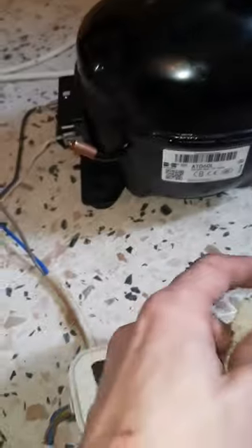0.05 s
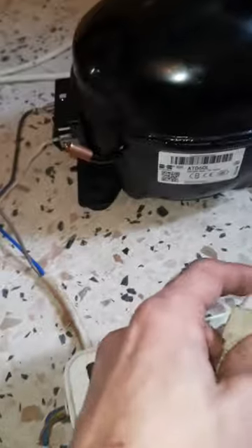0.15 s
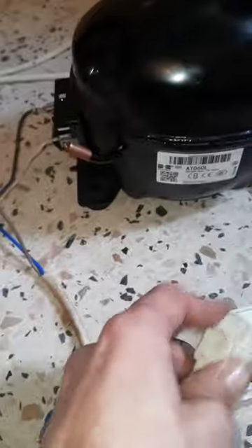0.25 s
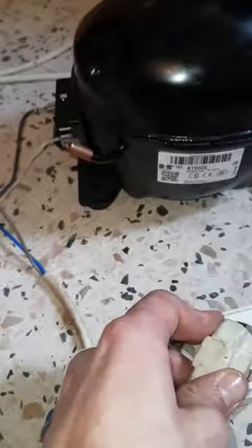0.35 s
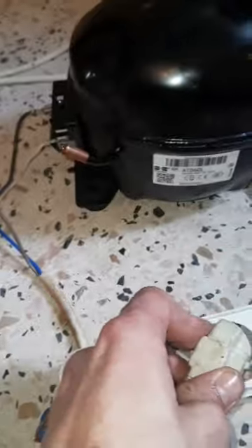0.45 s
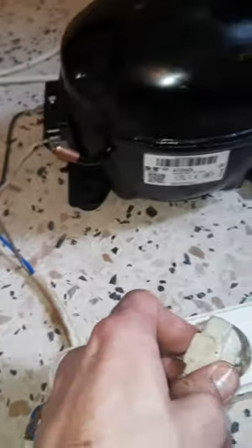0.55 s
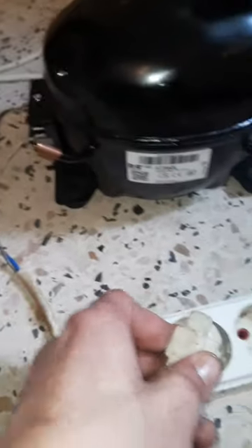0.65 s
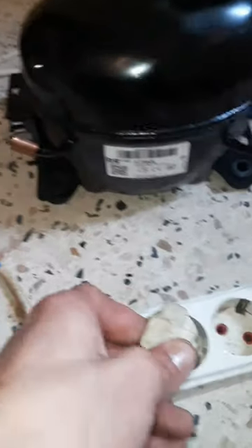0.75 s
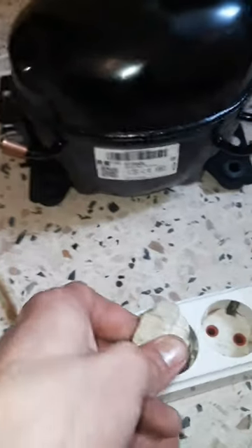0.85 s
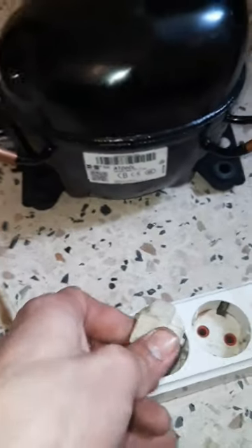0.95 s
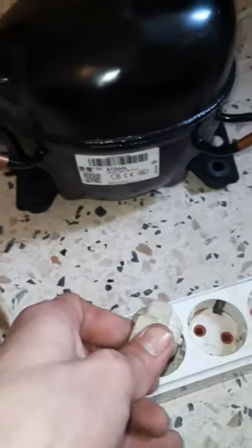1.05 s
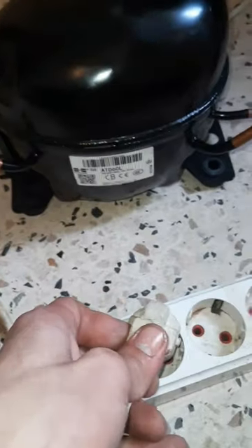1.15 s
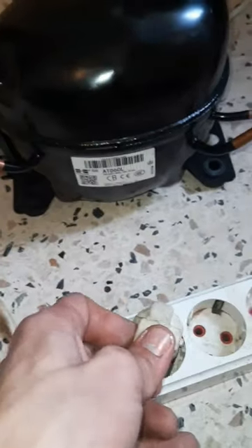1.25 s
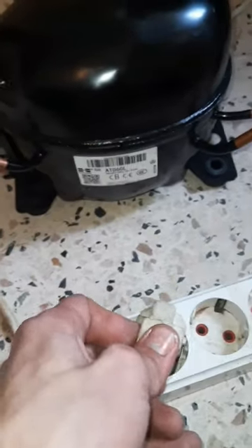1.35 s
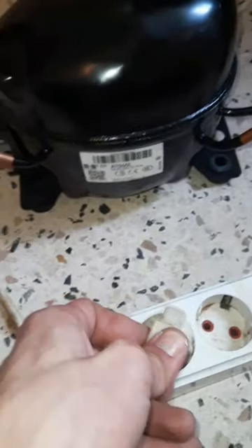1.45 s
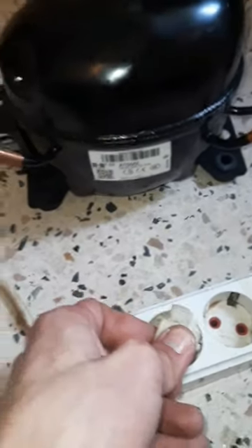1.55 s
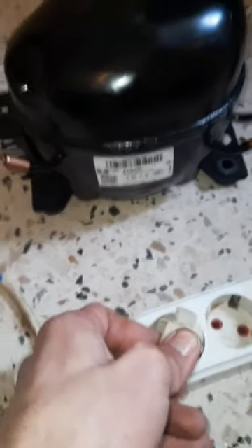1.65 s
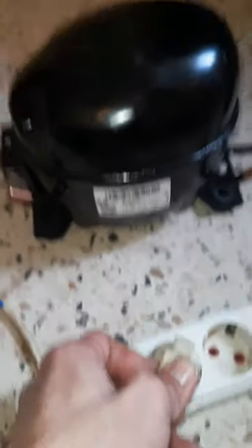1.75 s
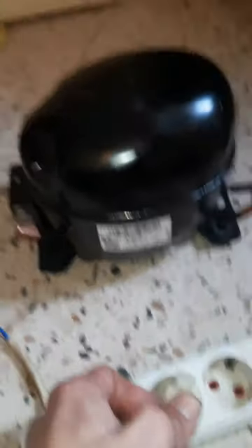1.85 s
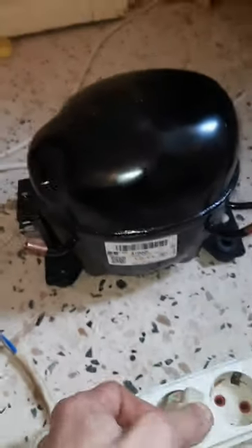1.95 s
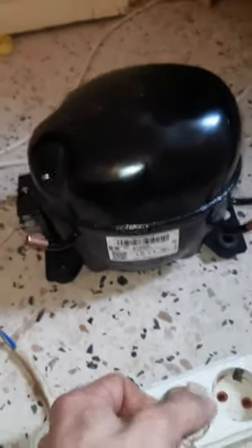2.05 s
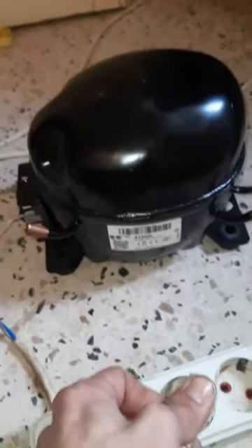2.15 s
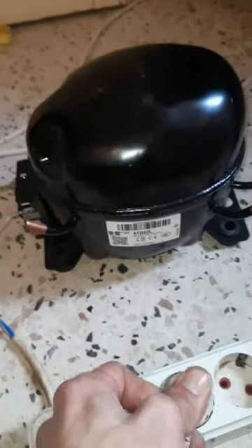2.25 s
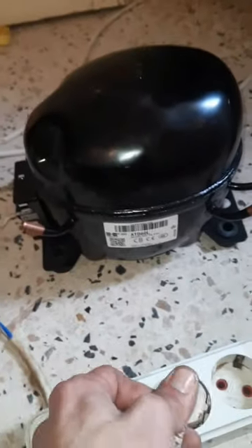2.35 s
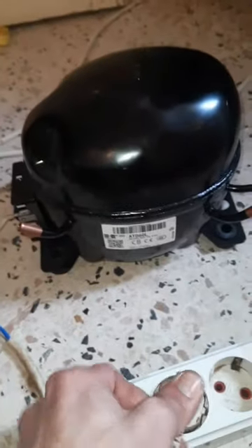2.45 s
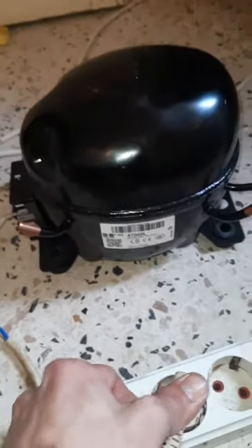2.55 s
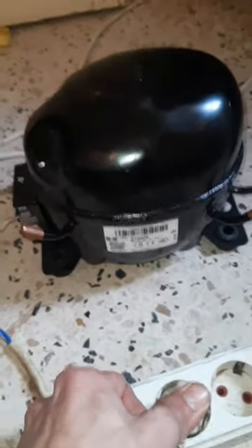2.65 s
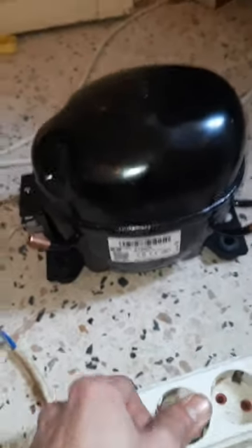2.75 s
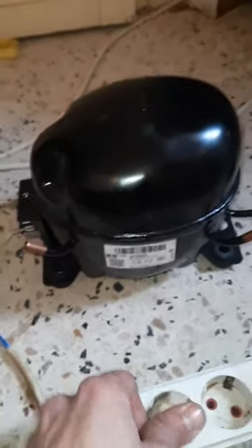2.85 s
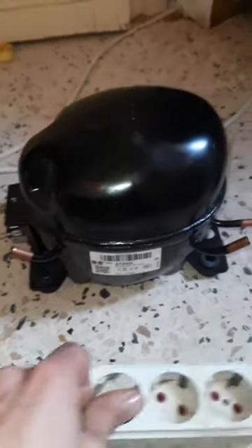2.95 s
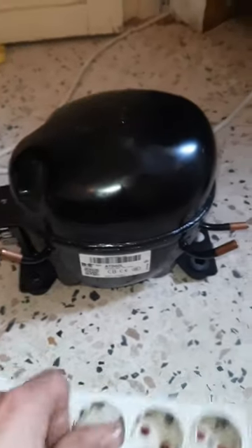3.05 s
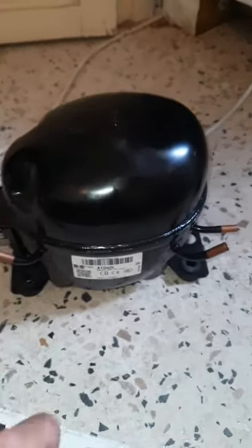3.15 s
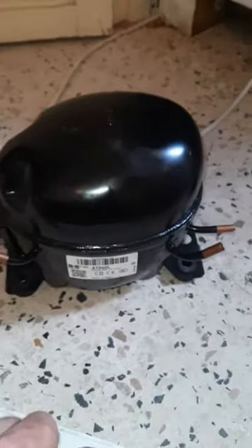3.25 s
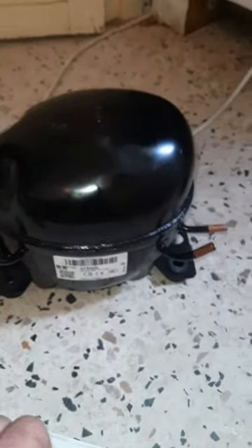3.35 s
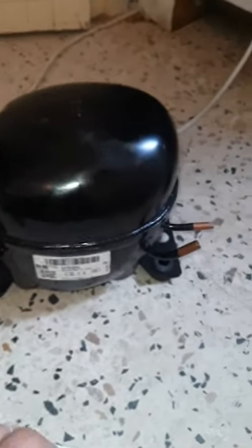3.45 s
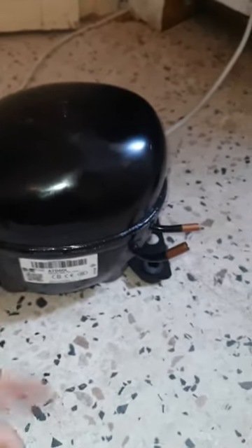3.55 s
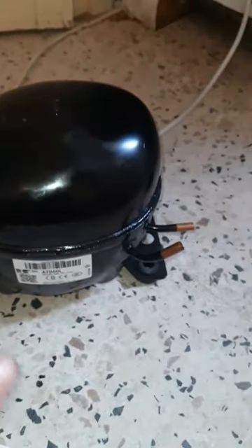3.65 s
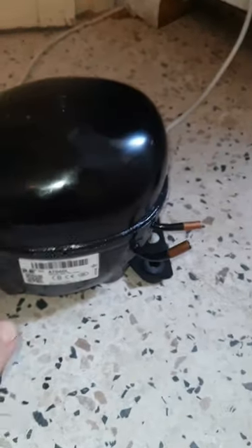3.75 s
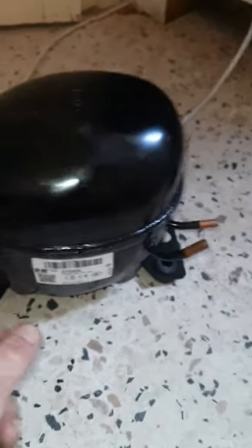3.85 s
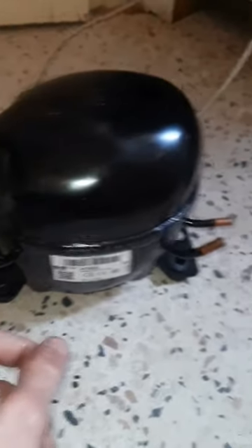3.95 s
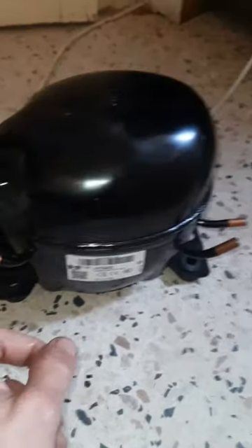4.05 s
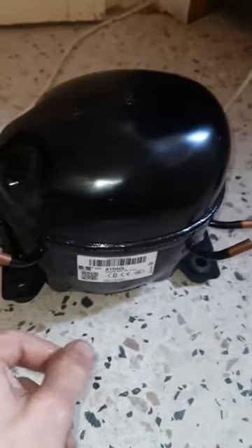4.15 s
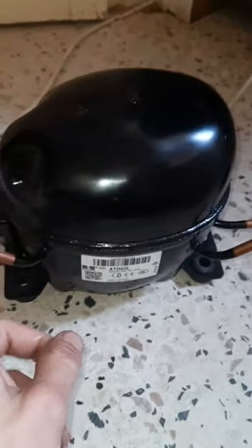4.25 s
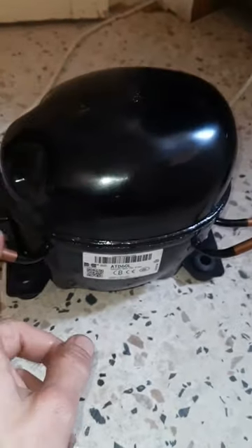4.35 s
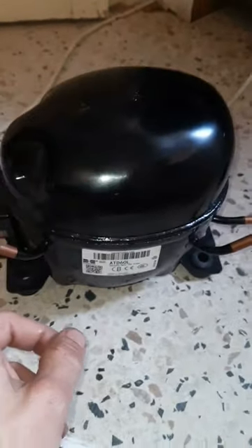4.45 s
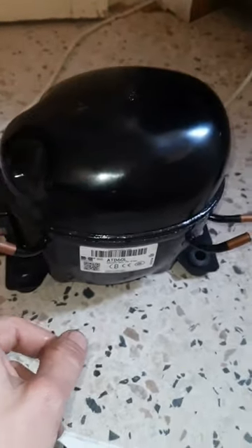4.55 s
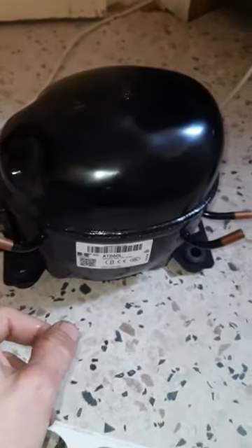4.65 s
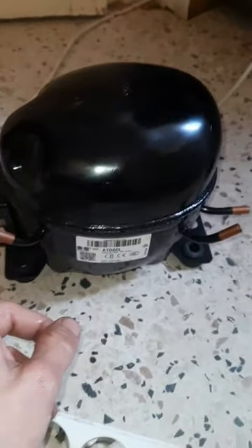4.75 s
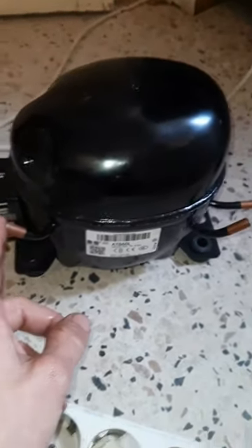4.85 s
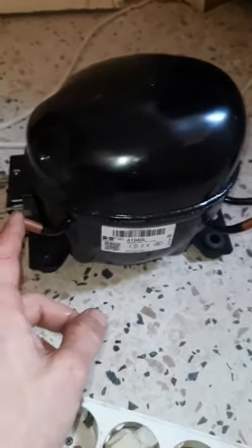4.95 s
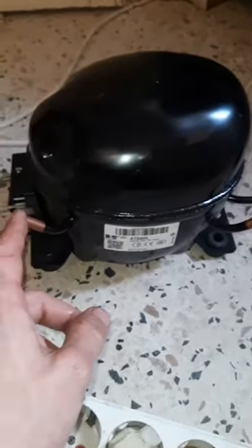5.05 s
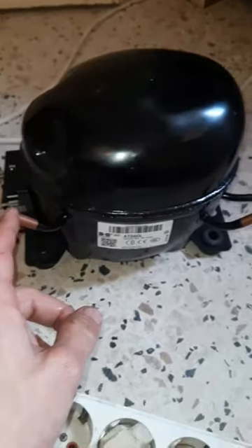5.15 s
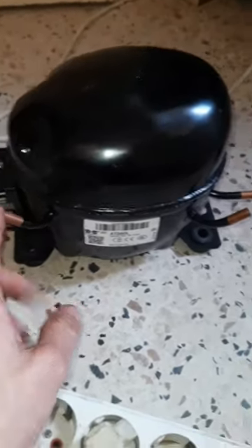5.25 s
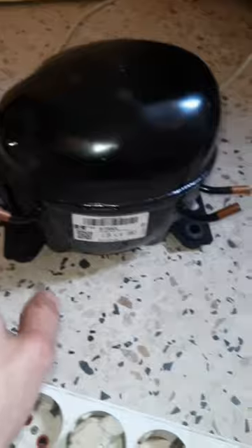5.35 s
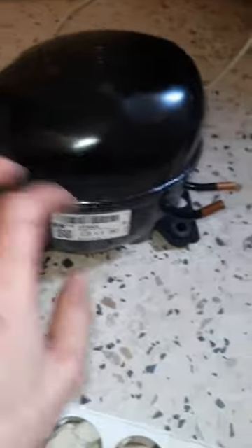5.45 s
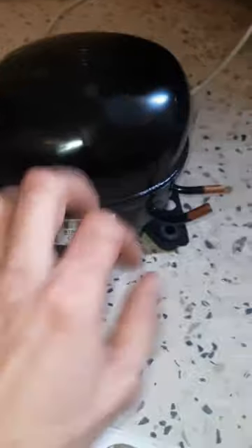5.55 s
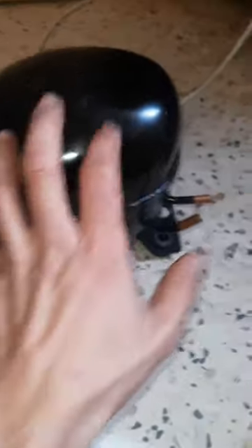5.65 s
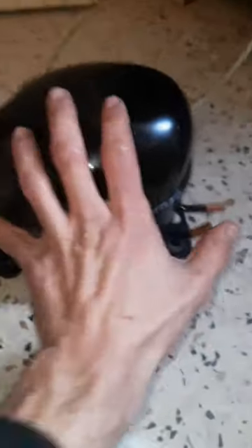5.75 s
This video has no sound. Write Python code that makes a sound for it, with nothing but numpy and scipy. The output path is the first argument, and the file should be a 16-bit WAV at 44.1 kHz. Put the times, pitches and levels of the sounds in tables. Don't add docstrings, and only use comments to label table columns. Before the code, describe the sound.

In a quiet room, plastic clacks and skin rubs lead to a sealed motor starting with a low hum and airy, faintly whistling hiss.

```python
import sys
import numpy as np
from scipy import signal
from scipy.fft import rfft, irfft
from scipy.io import wavfile

SR = 44100
rng = np.random.default_rng(int(sys.argv[2]) if len(sys.argv) > 2 else 0)


def to_wav(s):
    ch = np.atleast_2d(s).T
    pcm = np.round(np.clip(ch, -1, 1) * 32767)
    wavfile.write(sys.argv[1], SR, pcm.astype(np.int16))


def invert_db(x):
    u = np.asarray(x, float) / 20
    return 10 ** u


N = 255339


# multiple, level_db
SHAFT_ORDERS = [(1, -30), (2, -20), (3, -16), (4, -22), (5, 1), (6, -24), (7, -16.5), (8, -20), (9, -80),
                (10, -16)]
# multiple, level_db
HALF_ORDERS = [(2.5, -13), (7.5, -13.5)]
# start_s, hold_s, level_db, rise_s, fall_s
ROCKING = [
    (2.55, 0.41, -.1, .1, .2),
    (5.5, .3, -.1, 0.09, .3),
]
# start_s, hold_s, level_db, rise_s, fall_s
HUM = [
    (2.64, 1.97, -42, 0.14, .3),
    (4.7, .8, -52, 0.22, .5),
    (5.6, .3, -41, 0.25, .5),
]
# time_s, nearness_db, aim_db
FLOW = [(2.5, -38, 1), (2.576, 0.5, -4), (2.64, 2.8, -5), (2.96, -0.1, -2.5), (3.36, 0.7, 0),
        (3.53, -1, 1.5), (3.79, 2.35, -1.5), (4.2, 0.8, -5.7), (4.61, -0.5, -3), (5.3, -2, 0.5),
        (5.55, -0.2, -0.5), (5.79, -1, 0)]
# freq_hz, density_db_per_hz
HISS_LEFT = [(200, -0.5), (600, -19.5), (1000, -11), (1500, -7), (3200, -8), (4000, -1.5), (4500, -7),
             (5200, -4.5), (6200, 2.5), (7500, 6.5), (9200, 21.5), (13000, -5.5), (14500, 12), (15500, 2)]
# freq_hz, density_db_per_hz
HISS_RIGHT = [(200, -23.5), (900, -12.5), (1450, -18), (1900, -13), (3500, -7.5), (4100, -16.5),
              (4500, -21.5), (6000, -8), (6800, -15.5), (7700, -19.5), (9500, 19), (12500, -3.5),
              (14500, 7), (15600, -18)]
# pitch_hz, width_hz, level_db, turn_db (gained as the phone turns)
WHISTLES = [(7590, 150, -66, -1.5), (14740, 420, -45, 2), (4140, 270, -64, 0.8), (13200, 360, -62, 3),
            (6270, 190, -61.5, 2), (1393, 50, -64, 2.1), (3770, 190, -63, 2.5), (15420, 410, -44, -5)]

# start_s, cavity_peak_db, then relative to it box-free wall_db, clack_db, crack_db
TAPS = [(0.027, -32, -7, -1.1, -4.5), (0.403, -26, -8.5, -0.5, -5.5), (0.936, -62.5, -2.5, 11, 19),
        (1.079, -29.5, -32.5, -8.5, -13), (1.587, -41, -11.5, -15, -8), (1.609, -27.5, -1.5, 3, 12.5),
        (1.614, -22.5, -2.5, 4.5, -3.5), (2.463, -44, 13, 4.5, 8), (2.706, -14.5, 3, 1.5, 8.5),
        (3.171, -27.5, -14, -34, 9.5)]
# start_s, cavity_peak_db, then relative to it wall_db, clack_db, crack_db
BUMPS = [(0.065, -37, -0.5, -5.5, -22), (0.185, -37, -13, -7.5, -11), (0.309, -48.5, -8.5, -7, -0.5),
         (1.973, -68.5, 11, 8.5, -23), (2.194, -51, 3, 5, 5), (2.402, -44, 3.5, 2, 13.5),
         (2.616, -47.5, 3.5, 8.5, 19.5)]
# pitch_hz, level_db, t60_s
CAVITY = [(931, 3.5, 0.02), (971, 3.5, 0.016)]
# pitch_hz, level_db, t60_s
BOX = [(323.4, 2.5, 0.094), (252, -8, 0.073)]
# pitch_hz, level_db, t60_s
WALL = [(570, -1, 0.011), (773, 1.7, 0.01)]
# pitch_hz, level_db, t60_s
CLACK = [(1270, -3.5, 0.018), (1590, -3.5, 0.011), (2113, 0.5, 0.03), (2934, -4.5, 0.037)]
# low_hz, high_hz
FAMILY_SPAN = [(820, 1080), (250, 420), (480, 850), (1300, 2900), (3300, 15000)]
FAMILY_SEND = [-4, -0.87, -1.9, -0.0069, -0.72]

# start_s, hold_s, level_db, rise_s, fall_s
SCRAPES = [(.03, .1, -62.5, 0.09, 0.051), (.324, .001, -73, .24, 0.12), (.634, 0.22, -70, 0.31, 0.23),
           (1.16, .001, -80, 0.53, 0.1), (1.59, 0.095, -58, 0.059, .03), (2.126, .001, -88, .5, 0.32),
           (2.408, 0.0011, -55.5, .004, .06), (2.465, .001, -44.5, 0.023, 0.051),
           (2.49, 0.022, -61, 0.015, 0.1), (3.01, 0.064, -40.5, 0.03, 0.087),
           (3.18, 0.0012, -43, 0.18, 0.077), (3.25, 0.036, -44, .08, 0.05)]
# start_s, hold_s, level_db, rise_s, fall_s
RUBS = [(0, 0.12, -57.5, .1, .1), (.784, .001, -57, 0.4, 0.21), (1.16, .001, -86, .5, .9),
        (1.59, .015, -58.5, 0.095, 0.086), (2.126, 0.1, -72, 0.24, 0.18), (2.408, 0.017, -59.5, .004, .05),
        (2.465, .001, -47, 0.042, 0.017), (2.52, .04, -60.5, .08, 0.047), (3.01, 0.075, -51, 0.18, 0.044),
        (3.18, 0.043, -29.5, 0.057, 0.07), (3.25, 0.042, -38, .05, .033)]
# freq_hz, density_db_per_hz
RUB_COLOUR = [(300, -23.5), (1000, 18), (2500, -17.5), (5000, -6.5), (7500, -6), (9500, 1), (14000, -5.5),
              (15500, 16)]
# freq_hz, level_db
RUB_SHADOW = [(3000, -0.5), (6000, -15.5), (15000, -22)]

# start_s, hold_s, level_db, rise_s, fall_s
GRIP = [(0, .001, -59, .1, 1), (.71, 0.15, -66, 0.4, 0.14), (1.27, 0.00087, -72, 0.11, 1),
        (2.05, 0.32, -73.5, .9, 0.23), (2.48, 0.0014, -49, 0.06, 0.062), (3.02, 2.8, -63.5, 1.04, .9),
        (3.21, .001, -51, .25, 0.33), (3.81, 0.00086, -52.5, 0.17, 0.46), (5.79, .001, -63, 1.5, .9)]
# start_s, hold_s, level_db, rise_s, fall_s
SWAY = [(0, 0.12, -57.5, .1, .28), (.47, .001, -63.5, 0.1, 0.3), (.7, .001, -66.5, 0.19, 0.98),
        (1.1, .001, -59.5, 0.053, 0.41), (1.62, 0.088, -57, 0.18, 0.067), (1.87, 0.1, -58, .044, 0.13),
        (2.19, .001, -59.5, 0.065, 0.42), (2.55, 0.00075, -56, 0.34, 0.14)]
# start_s, peak_db
THUMPS = [
    (4.611, -31),
    (5.659, -37),
]

# freq_hz, density_db_per_hz
AIR = [(15, -24.5), (25, -39), (59, -8), (378, -20), (421, -24.5), (509, -29.5), (5730, -41), (7910, -33.5),
       (9300, -24), (13900, -41), (15500, -23)]
# start_s, hold_s, level_db, rise_s, fall_s
PIPE = [
    (1.4, .16, -78, .1, .16),
    (2.2, .12, -76, .15, .2),
    (2.55, .4, -67, .12, .95),
]
# freq_hz, t60_s
ROOM_T60 = [(300, 0.31), (1000, 0.29), (4000, 0.22), (12000, 0.21)]
# freq_hz, level_db
MIC_LEFT = [(100, 0.5), (4400, 4.5), (5500, -8.5), (6500, -18), (6900, -20), (8300, -21), (9000, -27.5),
            (10000, -36), (11000, -6), (15500, -11)]
# freq_hz, level_db
MIC_RIGHT = [(100, 1.5), (8000, 6.5), (8700, -9.5), (9700, -14.5), (11000, -5.5), (13500, 7), (15500, -16)]

TIME_S = np.arange(N) / SR
START_S, SHAFT_HZ, RUN_UP_S = 2.5, 19.66, 0.05
SHELL_DB, TOP_DB = -44.5, -45.5
TURN_S, TURN_TAKES_S, WHISTLE_LEFT_DB = 4.3, 0.35, -8.5
TAP_BOX_DB, BUMP_BOX_DB = -14, -5.5
THUMP_MS = 3.6
AIR_DB, ROOM_DB = -67.5, -5
PIPE_HZ, PIPE_HZ_PER_DB, PIPE_WAVER_HZ = 446, 0.8, 9


def rms_one(x):
    return x / np.sqrt(np.mean(x ** 2) + 1e-20)


def in_time(table):
    s, *columns = np.transpose(table)
    return [np.interp(TIME_S, s, column) for column in columns]


def at_hz(points, hz):
    freqs, values = np.transpose(points)
    return np.interp(np.log(hz + 1), np.log(freqs), values)


def coloured(x, points):
    level_db = at_hz(points, np.arange(4097) * SR / 8192)
    cepstrum = irfft(np.log(invert_db(level_db)))
    cepstrum[1:4096] *= 2
    cepstrum[4097:] = 0
    impulse = irfft(np.exp(rfft(cepstrum)))
    return signal.fftconvolve(x, impulse)[:N]


def band(x, low_hz, high_hz):
    sos = signal.butter(2, [low_hz, min(high_hz, 0.45 * SR)], "band", fs=SR, output="sos")
    return signal.sosfilt(sos, x)


def drift(rate_hz):
    r = np.exp(-80 * np.pi * rate_hz / SR)
    slow = signal.lfilter([1], [1, -2 * r, r * r], rng.standard_normal(N // 40 + 2002))[2000:]
    return np.interp(np.arange(N) / 40, np.arange(len(slow)), rms_one(slow))


def swells(rows):
    t = np.arange(0, N, 64)[:, None] / SR
    s, hold, db, rise, fall = np.transpose(rows)
    before = np.clip(s - t, 0, None) / np.abs(rise)
    after = np.clip(t - s - hold, 0, None) / np.abs(fall)
    power = np.sum(invert_db(2 * (db - 20 * np.minimum(before + after, 8))), axis=1)
    return np.interp(TIME_S, t[:, 0], np.sqrt(power))


def ring(drive, hz, t60):
    r, w = invert_db(-60 / (t60 * SR)), 2 * np.pi * hz / SR
    return signal.lfilter([0, np.sin(w)], [1, -2 * r * np.cos(w), r * r], drive + 1e-18)


def body(drive, modes):
    return sum(invert_db(db) * ring(drive, hz, t60) * (-1) ** k for k, (hz, db, t60) in enumerate(modes))


def pair_of_noises(alike, left_late):
    shared, left, right = rng.standard_normal((3, N))
    common = np.array([np.roll(shared, left_late), shared])
    return np.sqrt(alike) * common + np.sqrt(1 - alike) * np.array([left, right])


def patchy(x, low_hz, high_hz, patch_db):
    edges = np.geomspace(low_hz, high_hz, round(2 * np.log2(high_hz / low_hz)) + 2)
    spans = zip(edges, edges[1:])
    return sum(band(x, a, b) * invert_db(patch_db * drift(1.16)) * (-1) ** k for k, (a, b) in enumerate(spans))


def motor():
    run_up = np.exp(-np.clip(TIME_S - START_S, 0, None) / RUN_UP_S)
    speed = SHAFT_HZ * (1 - 0.3 * run_up + 0.003 * drift(2))
    turn = 2 * np.pi * np.cumsum(speed) / SR
    flow_db, aim_db = in_time(FLOW)
    noise = pair_of_noises(alike=0.45, left_late=-20)
    running = np.clip((TIME_S - START_S) / 0.19, 0, 1)
    hum = motor_hum(turn) * invert_db(np.array([[-0.3], [0.4]]))
    return running * (hum + shell_hiss(noise, turn, flow_db, aim_db) + shell_whistles(noise, flow_db))


def motor_hum(turn):
    steady, unsteady = 0, 0
    for k, db in SHAFT_ORDERS:
        start = rng.uniform(0, 2 * np.pi)
        if k % 5 == 0:
            steady = steady + invert_db(db) * np.sin(k * turn + start)
        else:
            unsteady = unsteady + invert_db(db + 2.64 * drift(2.0)) * np.sin(k * turn + start)
    rocking = np.clip(swells(ROCKING), 0, 1)
    halves = sum(invert_db(db) * np.sin(k * turn) for k, db in HALF_ORDERS)
    hum = steady + (1 - 0.56 * rocking) * unsteady + rocking * halves
    rumble = invert_db(-18) * rms_one(band(rng.standard_normal(N), 23, 202))
    return np.sqrt(2) * swells(HUM) * (hum + rumble)


def shell_hiss(noise, turn, flow_db, aim_db):
    hiss = np.array([coloured(noise[0], HISS_LEFT), coloured(noise[1], HISS_RIGHT)])
    shell = rms_one(patchy(hiss, 317, 8684, patch_db=1.28))
    top = rms_one(patchy(hiss, 9850, 23400, patch_db=1.9))
    valve_throb = 1 + 0.14 * np.sin(2 * turn) + 0.12 * np.sin(3 * turn)
    winding_throb = 1 + 0.24 * np.sin(2 * turn) + 0.14 * np.sin(3 * turn) + 0.15 * np.sin(5 * turn)
    shell = shell * valve_throb * invert_db(SHELL_DB + flow_db + 9 + 1.05 * drift(17.5))
    top = top * winding_throb * invert_db(TOP_DB + flow_db + aim_db + 6.5 + 1.0 * drift(44))
    return shell + top


def shell_whistles(noise, flow_db):
    turned = np.tanh((TIME_S - TURN_S) / TURN_TAKES_S)
    whistles = np.zeros((2, N))
    for hz, width, db, turn_db in WHISTLES:
        tone = rms_one(band(noise, hz - width / 2, hz + width / 2))
        whistles += tone * invert_db(db + flow_db + turn_db * turned + 1.5 * drift(2))
    whistles[0] *= invert_db(WHISTLE_LEFT_DB)
    return whistles


def knocks():
    near, far, t = np.zeros(N), np.zeros(N), np.arange(6000) / SR
    hits = [(s, db, TAP_BOX_DB, *rest) for s, db, *rest in TAPS]
    hits += [(s, db, BUMP_BOX_DB, *rest) for s, db, *rest in BUMPS]
    contact = rng.standard_normal((len(hits), len(t))) * np.exp(-t / 0.0028) * 0.14
    crack = band(contact * np.clip(t / 0.0008, 0, 1), 3375, 21500)
    contact[:, :12] += np.hanning(12)
    spot_db = rng.normal(0, 1.5, (len(hits), len(CLACK)))
    clack = sum(body(contact, [mode]) * invert_db(spot_db[:, [k]]) * (-1) ** k for k, mode in enumerate(CLACK))
    families = [body(contact, CAVITY), body(contact, BOX), body(contact, WALL), band(clack, 660, 3000), crack]
    click = (t == 0) + 1e-18
    smooth = [rms_one(band(click, *span)) for span in FAMILY_SPAN]
    for k, (s, cavity_db, *family_db) in enumerate(hits):
        here = slice(round(s * SR), round(s * SR) + len(t))
        for db, family, soft, send_db in zip([0, *family_db], families, smooth, FAMILY_SEND):
            hit = invert_db(cavity_db + db) * family[k] / np.max(np.abs(family[k]))
            near[here] += hit
            far[here] += soft * np.std(hit) * invert_db(send_db)
    return near, far


def room(x):
    t, tail = np.arange(SR // 2) / SR, 0
    for hz in 250 * 2.0 ** np.arange(6):
        noise = band(rng.standard_normal((2, len(t))), hz / np.sqrt(2), hz * np.sqrt(2))
        tail = tail + noise * invert_db(-60 * t / at_hz(ROOM_T60, hz)) * np.clip(t / 0.0013, 0, 1)
    tail = tail / np.sqrt(np.sum(tail ** 2) / 2)
    return signal.fftconvolve(x[None], tail, axes=1)[:, :N]


def hand():
    sizes = invert_db(2.0 * np.minimum(rng.exponential(1, (2, N)), 4))
    grains = sizes * rng.choice([-1, 1], (2, N)) * (rng.random((2, N)) < 2500 / SR)
    grains = grains + 0.15 * np.roll(grains[::-1], 2, axis=1)
    hollow = rms_one(body(grains, CAVITY) + invert_db(-0.5) * body(grains, WALL))
    grit = rms_one(band(grains, 1000, 3500))
    drag, slide = swells(SCRAPES), swells(RUBS)
    scrape = hollow * drag * invert_db(-2.5)
    scrape = scrape + grit * (invert_db(-10.5) * drag + invert_db(-8.5) * np.sqrt(drag * slide))
    left, right = pair_of_noises(alike=0.25, left_late=20)
    rub = np.array([coloured(coloured(left, RUB_COLOUR), RUB_SHADOW), coloured(right, RUB_COLOUR)])
    rub = rms_one(band(rub, 3000, 18000))
    return scrape * invert_db(2.9 * drift(25)) + rub * slide * invert_db(10.0 + drift(17))


def grip():
    rumble = rms_one(band(pair_of_noises(alike=0.6, left_late=-10), 180, 480))
    sway = rms_one(band(pair_of_noises(alike=0.93, left_late=0), 48, 170))
    share = np.array([np.clip((TIME_S - s) * 1000 / THUMP_MS, 0, 1) for s, db in THUMPS])
    push = band(-np.sin(np.pi * share) ** 2, 60, 520)
    thump = invert_db(np.array(THUMPS)[:, 1]) @ push / np.max(np.abs(push))
    return rumble * swells(GRIP) * invert_db(0.69 * drift(23.0)) + sway * swells(SWAY) + thump


def background():
    low, high = pair_of_noises(alike=0.9, left_late=0), pair_of_noises(alike=0.1, left_late=0)
    mixed = band(low, 27, 380) + band(high, 350, 19000)
    air = rms_one(np.array([coloured(side, AIR) for side in mixed]))
    air = air * invert_db(AIR_DB + 1.5 * drift(2.4))
    gain = swells(PIPE)
    weak_db = np.clip(20 * np.log10(gain / gain.max()), -40, 0)
    hz = PIPE_HZ + PIPE_HZ_PER_DB * weak_db + PIPE_WAVER_HZ * drift(6.7)
    pipe = np.sqrt(2) * gain * invert_db(4.5 * drift(12)) * np.sin(2 * np.pi * np.cumsum(hz) / SR)
    return air + pipe


def scene():
    near, far = knocks()
    direct = np.array([np.roll(near, 3), near]) * invert_db(np.array([[1.5], [-1.5]]))
    return motor() + direct + invert_db(ROOM_DB) * room(far) + hand() + grip() + background()


def roll_off(x):
    return signal.sosfilt(signal.butter(12, 16670, fs=SR, output="sos"), x)


def record(dry):
    heard = np.array([coloured(dry[0], MIC_LEFT), coloured(dry[1], MIC_RIGHT)])
    heard[0] = coloured(heard[0], [(6600, 0), (6950, -20), (8250, -20), (8700, 0)])
    heard = signal.sosfilt(signal.ellip(10, 0.5, 60, 15600, fs=SR, output="sos"), heard)
    return roll_off(heard)


dry = scene()
out = record(dry)
to_wav(out)
```